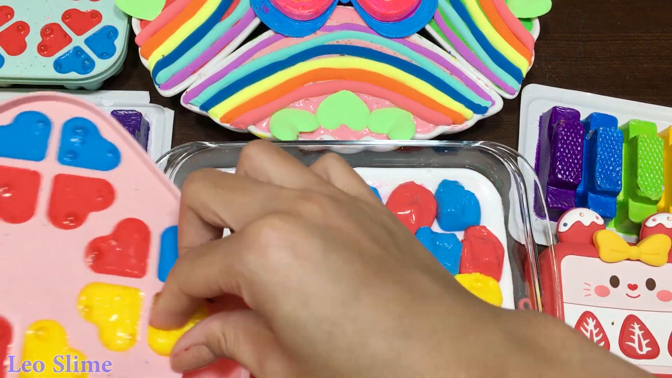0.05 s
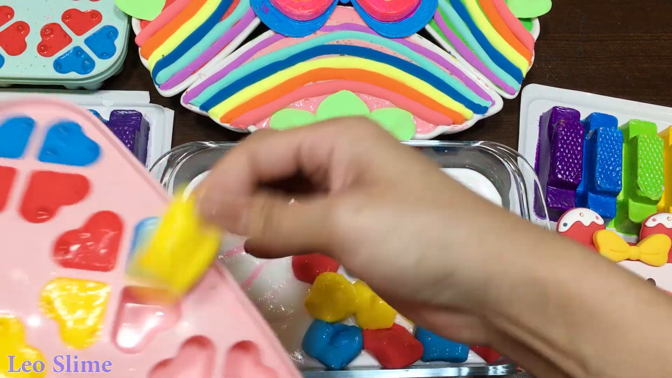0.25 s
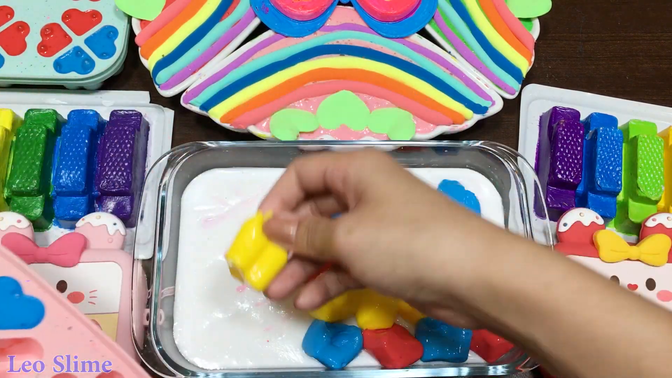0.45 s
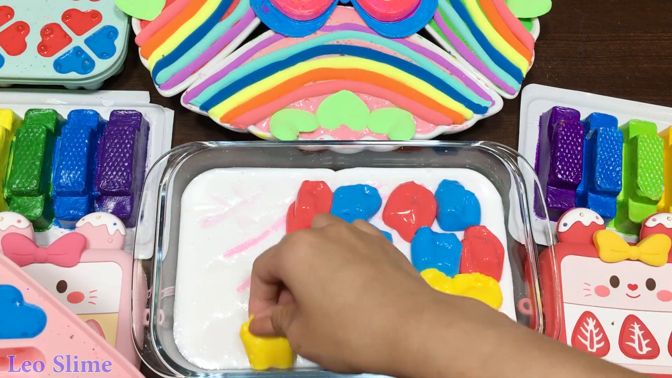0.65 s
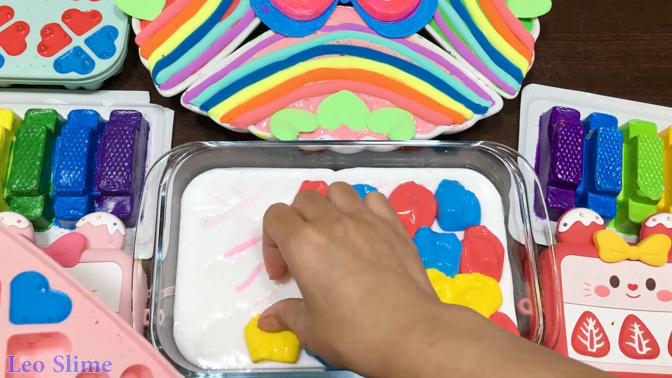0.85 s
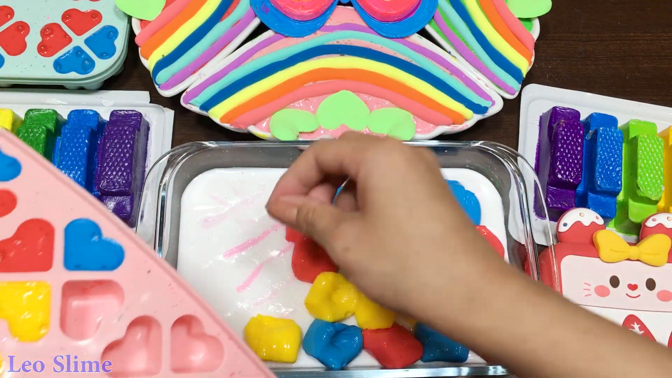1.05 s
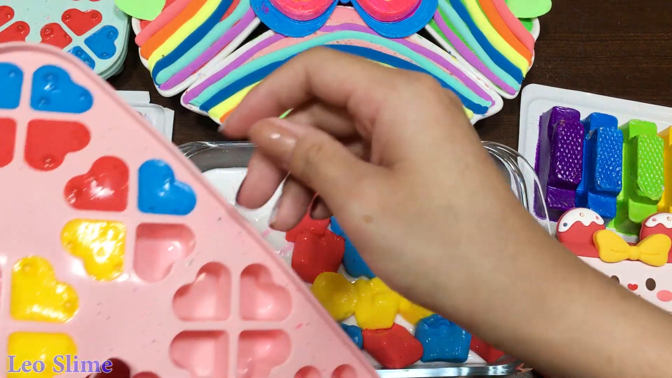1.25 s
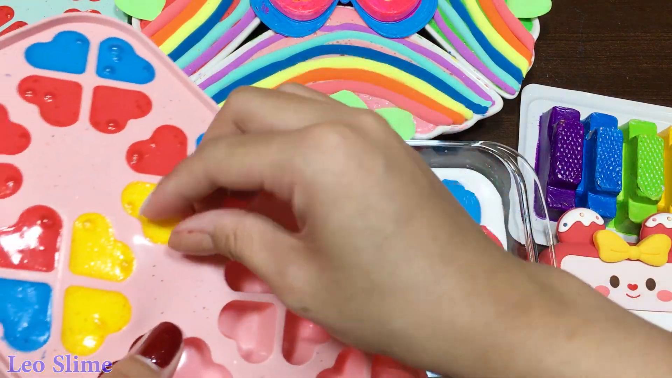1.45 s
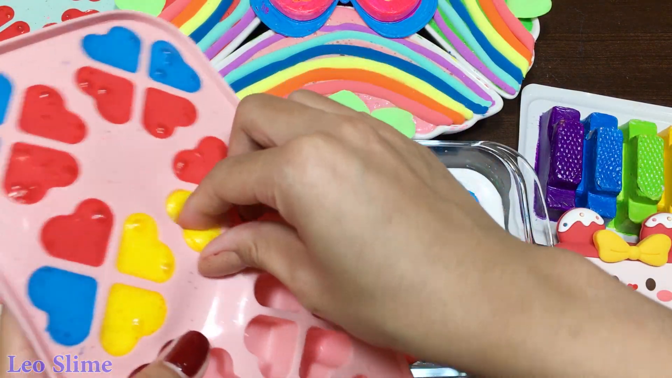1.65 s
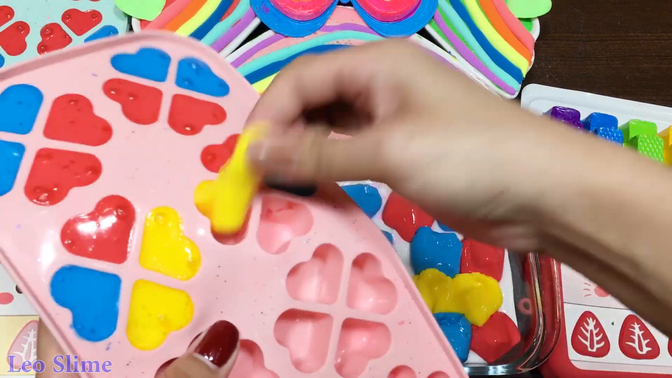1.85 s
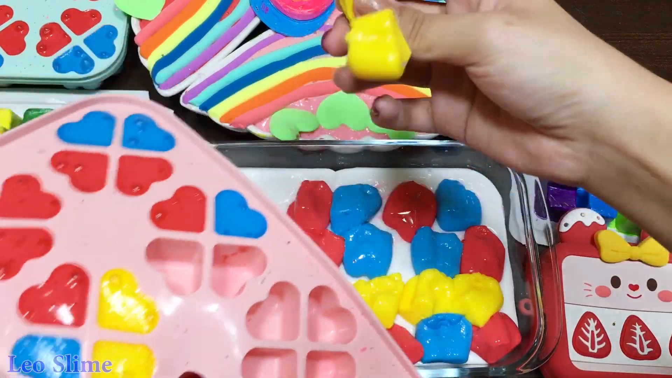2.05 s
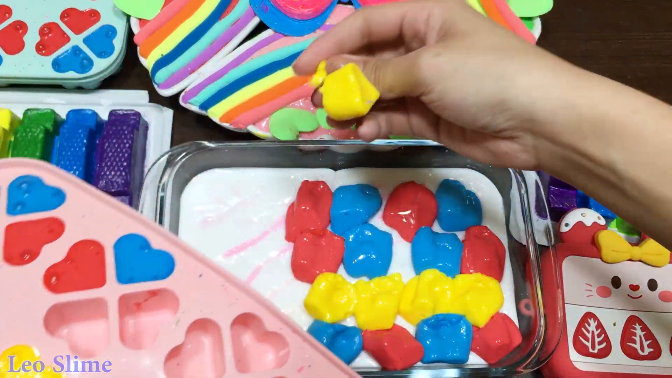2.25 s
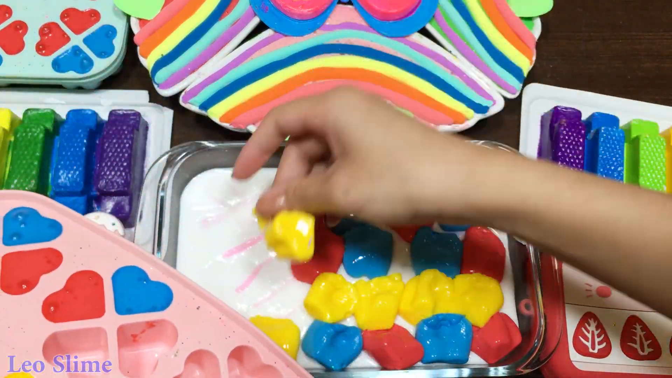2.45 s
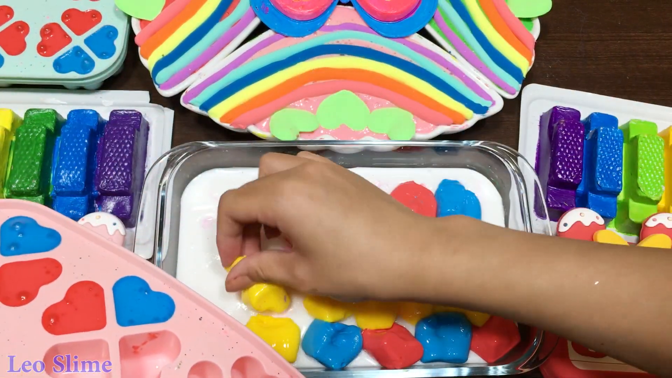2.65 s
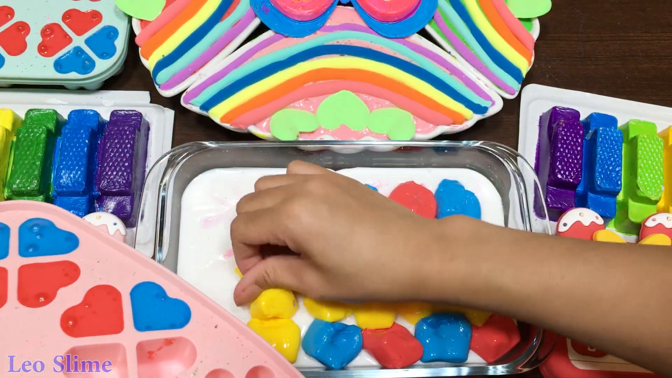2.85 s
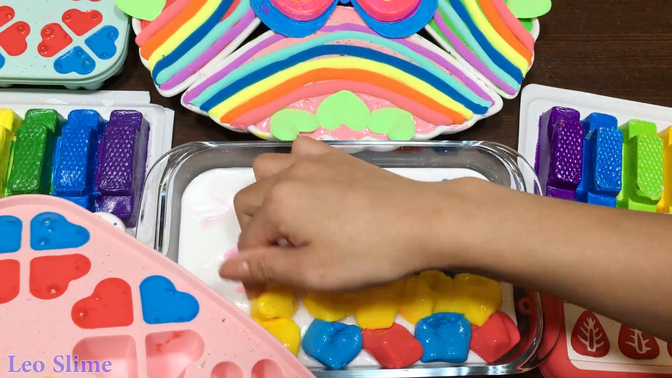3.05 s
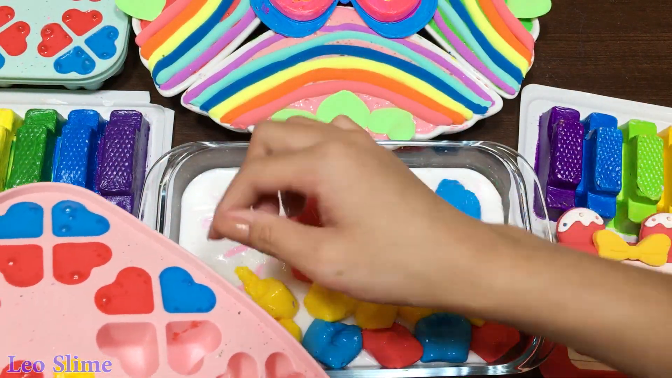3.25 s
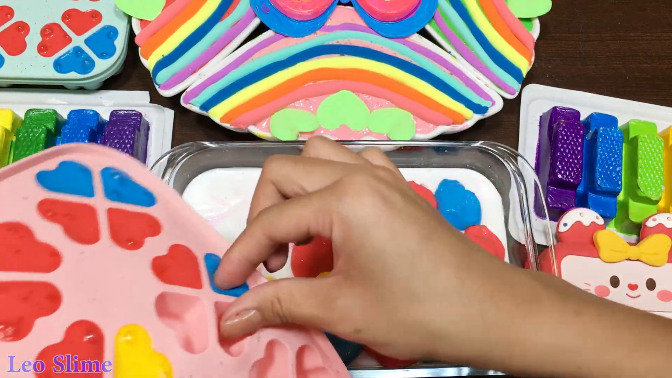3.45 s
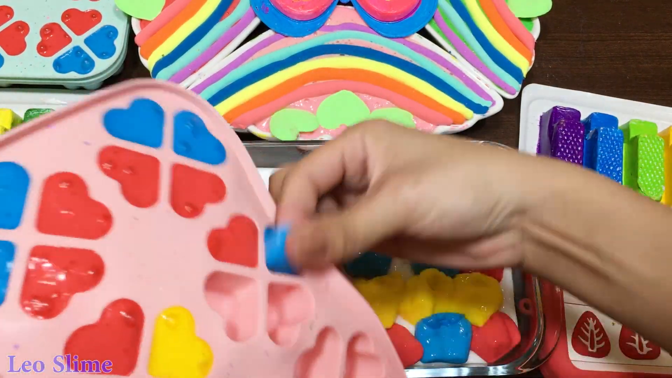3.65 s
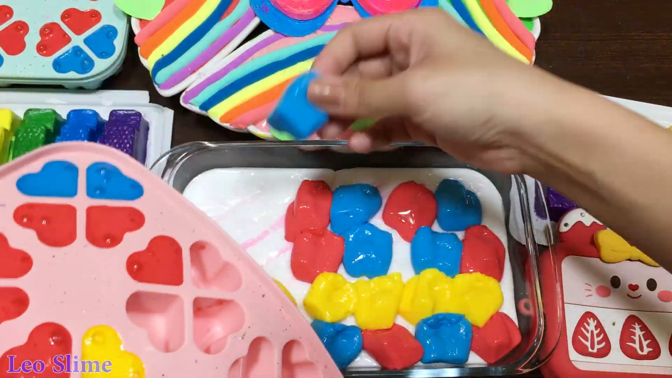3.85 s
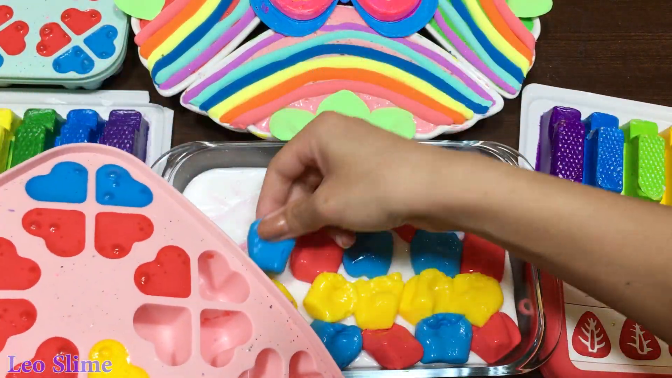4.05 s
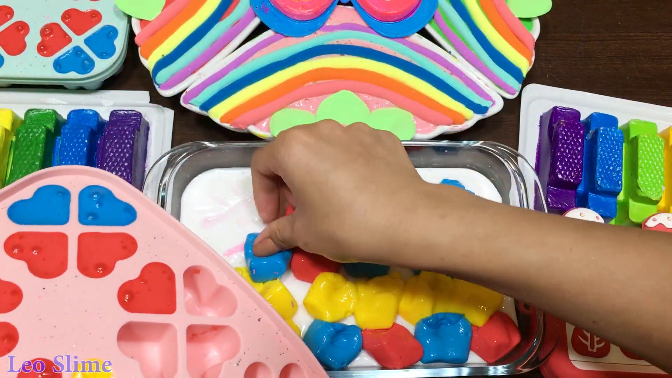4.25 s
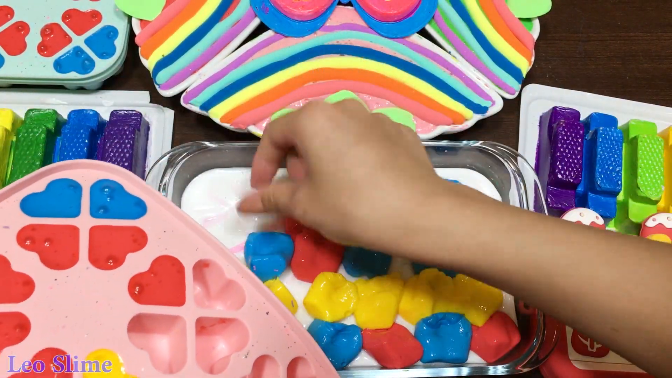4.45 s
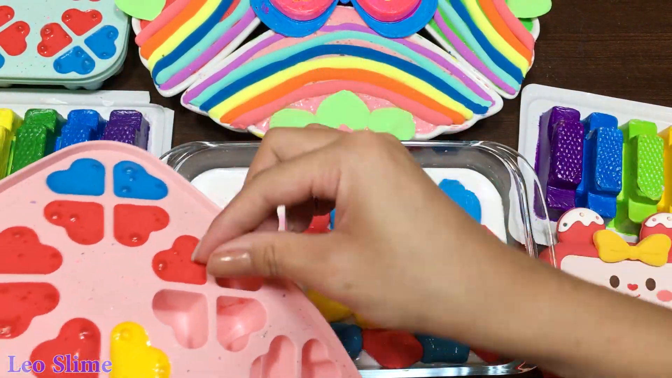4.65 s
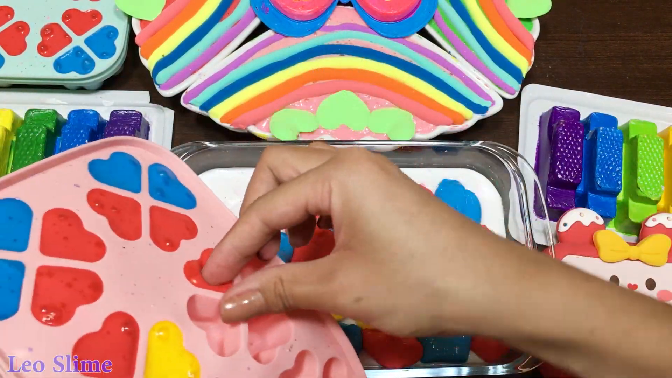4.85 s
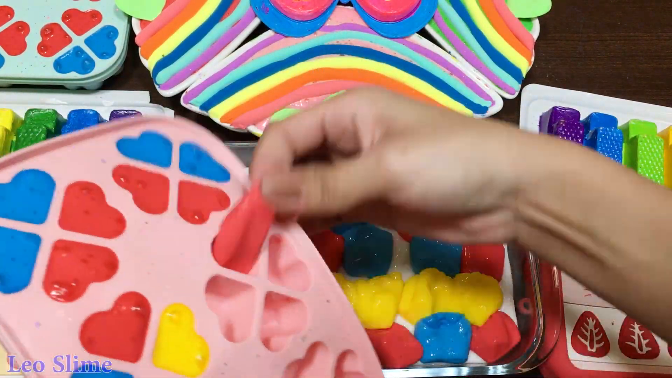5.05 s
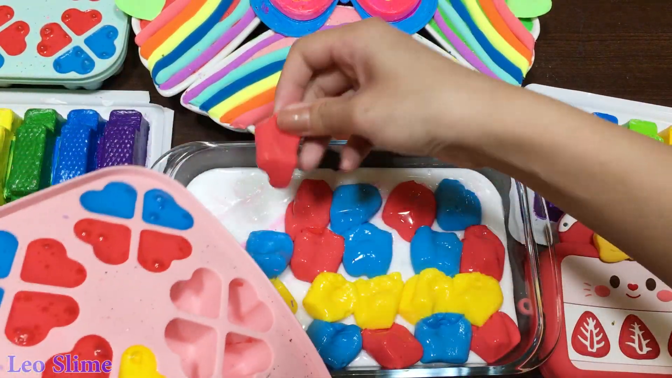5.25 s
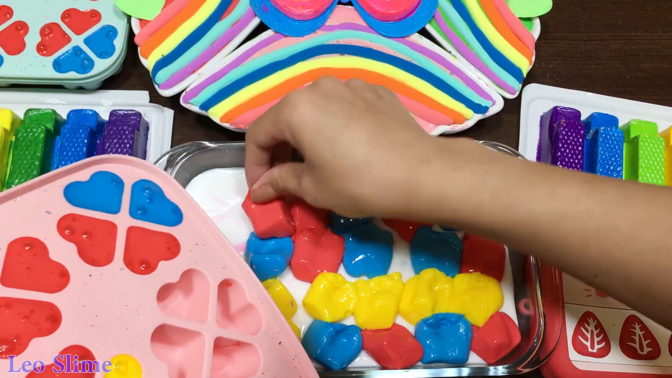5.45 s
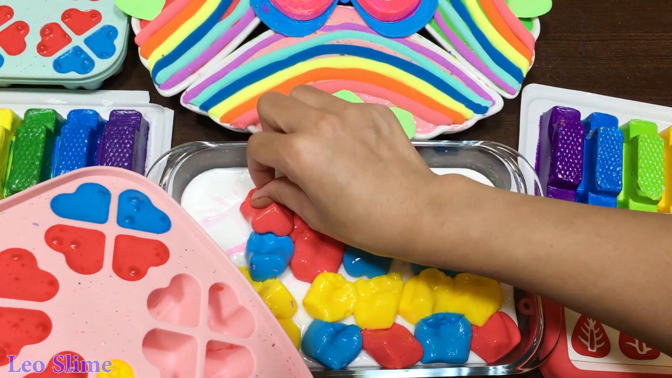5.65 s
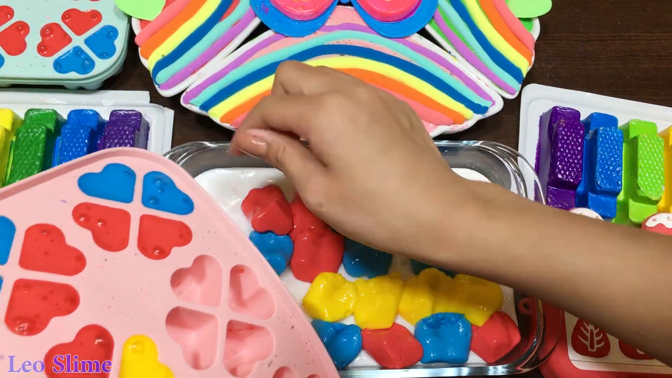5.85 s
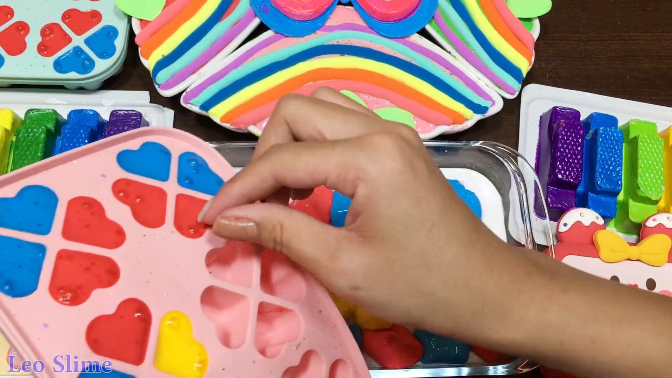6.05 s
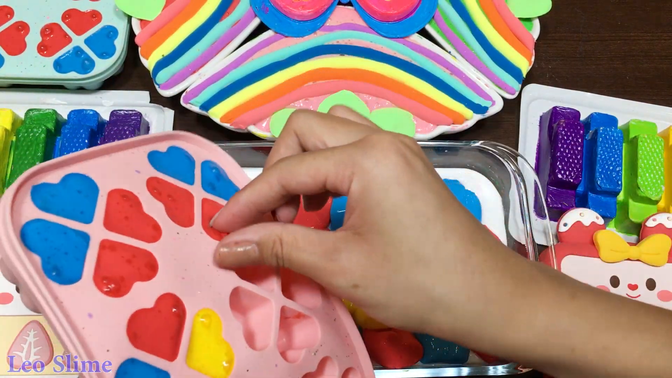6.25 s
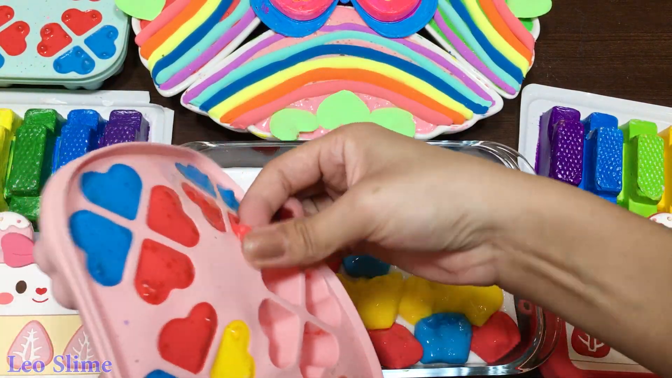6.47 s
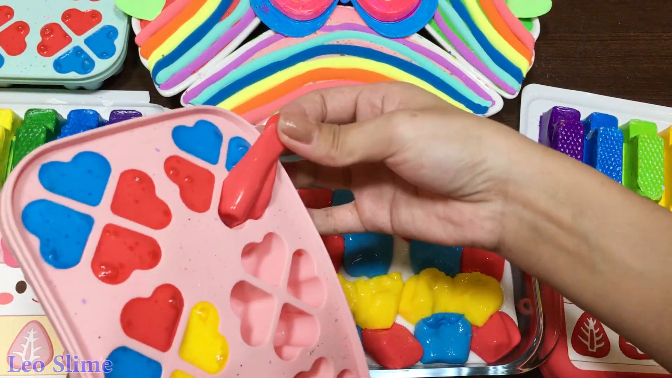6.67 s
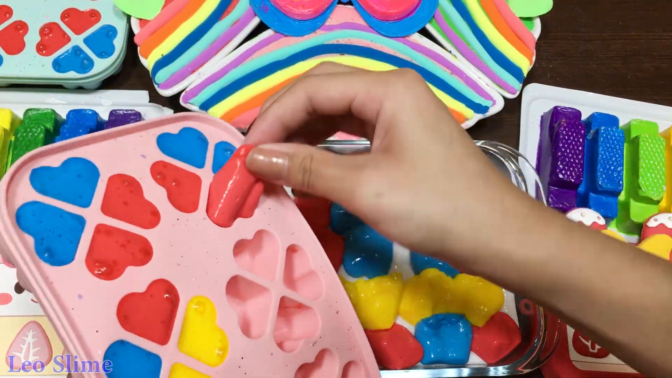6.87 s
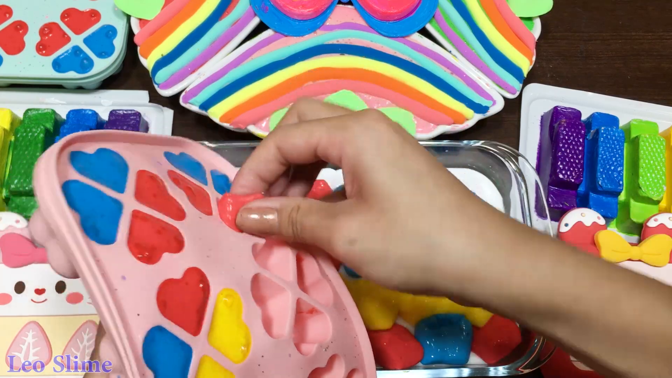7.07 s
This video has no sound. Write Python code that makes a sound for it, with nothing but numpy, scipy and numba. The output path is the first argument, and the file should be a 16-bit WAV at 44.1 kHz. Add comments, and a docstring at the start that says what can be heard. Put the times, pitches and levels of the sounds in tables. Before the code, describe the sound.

Very close to the microphone, five soft clay shapes are pulled from a flexible mould. Each pull builds a fine sticky crackle, then snaps brightly with a short suck of air. Between pulls come faint finger smacks, little wet bubbles and soft presses, and one dull mould knock before the fourth pull. A quiet small room holds a low throbbing appliance hum.

```python
"""Sticky skin tears and air pockets snap as five soft clay hearts leave a flexible mould, close to the ear.
Streams of tiny ringing grains make the tearing and the gurgle; swept noise makes the air rushing into each hollow.
Snaps, bubbles and soft thuds are short damped modes with a spray of echoes; fingers smack and the mould is bumped.
The handling has a faint room tail; two motors beat against each other beneath it, with hum and a rush of air."""
import sys
import numpy as np
from scipy import signal
from scipy.fft import rfft, irfft
from scipy.io import wavfile
from scipy.ndimage import uniform_filter1d
from numba import njit

SR = 44100
rng = np.random.default_rng(int(sys.argv[2]) if len(sys.argv) > 2 else 0)


def file_out(sig):
    """Save sig as 16-bit WAV at sys.argv[1]."""
    # one column per channel
    cols = np.atleast_2d(sig).T
    # limit, then scale
    lim = np.clip(cols, -1, 1)
    pcm = np.round(lim * 32767).astype(np.int16)
    wavfile.write(sys.argv[1], SR, pcm)


N = 313551
TIME = np.arange(N) / SR

# The pieces leaving the mould. Each row: edge gives way in seconds, piece lets go in seconds,
# stretching before the edge in seconds, peeling before the edge in seconds, tearing level in dB,
# sucked air level in dB, slack dip in dB, cavity pitch at release in Hz, cavity level in dB.
PULLS = [(0.345, .395, .33, 0.025, -37.5, -41, 2, 2290, -45.5),
         (1.968, 2.033, .35, 0.057, -36, -40, 4.5, 1694, -44),
         (3.797, 3.85, 0.19, 0.031, -37, -42, 7, 2030, -37),
         (5.169, 5.242, .03, .036, -44, -48, 5.5, 2000, -41),
         (6.649, 6.7, 0.084, 0.015, -43.5, -52, 8.5, 3307, -43.5)]


def undb(db):
    """Decibels to gain."""
    return 10 ** (np.asarray(db) / 20)


def unit(x):
    """Scale to rms 1."""
    return x / np.sqrt(np.mean(x ** 2))


def colour(x, points):
    """Filter by a spectrum of (Hz, dB) points, joined along log frequency."""
    hz, db = np.transpose(points)
    bins = np.maximum(np.fft.rfftfreq(len(x), 1 / SR), 1)
    gain = undb(np.interp(np.log(bins), np.log(hz), db))
    return irfft(rfft(x) * gain, len(x))


def walk(rate):
    """Slow random drift with rms 1; rate is new values per second."""
    k = max(int(SR / rate), 1)
    steps = np.repeat(rng.standard_normal(N // k + 1), k)
    smooth = uniform_filter1d(uniform_filter1d(steps, k), k)
    return unit(smooth[:N])


def add(track, s, sound):
    """Mix a sound in at time s."""
    i = max(int(s * SR), 0)
    track[i:i + len(sound)] += sound[:N - i]


def fade(t, t60):
    """Exponential decay, 60 dB down after t60 seconds."""
    return np.exp(-np.log(1000) * t / t60)


def thin(x, corner_hz):
    """A small source radiates little below its corner."""
    return signal.sosfilt(signal.butter(2, corner_hz, "high", fs=SR, output="sos"), x)


def ring(modes, size=6000):
    """Damped sines from rows (Hz, dB, t60), with peak 1."""
    t = TIME[:size]
    y = sum(undb(db) * np.sin(2 * np.pi * hz * t) * fade(t, t60) for hz, db, t60 in modes)
    return y / np.abs(y).max()


def grains(rate, low_hz, high_hz, cycles, spread_db, size=200):
    """A stream of tiny ruptures, each a damped sine with its own moment, pitch and size."""
    when, pitch, strength, sign = rng.random((int(rate * N / SR), 4)).T[:, :, None]
    hz = low_hz + (high_hz - low_hz) * pitch
    # many weak ruptures, few strong ones, with a ceiling
    strength_db = spread_db * np.minimum(-np.log(1 - strength), np.pi)
    gain = np.sign(sign - .5) * undb(strength_db) * hz
    waves = gain * np.sin(2 * np.pi * hz * TIME[:size]) * fade(TIME[:size], cycles / hz)
    places = (when * N).astype(int) + np.arange(size)
    return np.bincount(places.ravel(), waves.ravel(), N + size)[:N]


def peel(edge_s, free_s, peel_s, slack_db, growth_db):
    """Gain of one pull: it builds, the edge gives way, the clay stretches slack, tightens again and lets go."""
    before, after = np.maximum(edge_s - TIME, 0), np.maximum(TIME - free_s, 0)
    progress = np.clip((TIME - edge_s) / (free_s - edge_s), 0, 1)
    # a 12 dB build over the peel, with a 10 dB jump in the last 11 ms before the edge gives way
    attack = 10 * np.minimum(before / 0.011, 1) + 12 * (before / peel_s) ** 2
    hold = growth_db * progress - slack_db * np.sin(np.pi * progress)
    # a 22 dB cut within 7 ms of letting go, on a tail of 383 dB per second
    release = 22 * np.minimum(after / .007, 1) + 383 * after
    return undb(np.maximum(hold - attack - release, -200))


def parting():
    """How strongly skin tears and air is sucked in, from the pulls and the finger contacts."""
    # Sticky finger contacts. Each row: peak time in seconds, rise in seconds,
    # tearing level in dB, squelch level in dB.
    touches = [(0.033, 0.019, -65.5, -64), (.53, .05, -65, -70), (.79, 0.028, -66.5, -71.5),
               (.869, 0.012, -52, -63.5), (1.053, 0.013, -54.5, -56), (1.41, 0.067, -83, -70),
               (1.632, .01, -64, -52), (2.083, 0.0069, -52, -69.5), (2.22, 0.018, -53.5, -69),
               (2.41, 0.051, -63.5, -71), (2.557, 0.026, -56.5, -71), (2.795, 0.032, -62.5, -80),
               (3.029, 0.031, -55.5, -65.5), (3.057, 0.0086, -47.5, -51), (3.106, 0.027, -60.5, -71),
               (3.322, 0.0092, -59, -59.5), (3.96, 0.0074, -54, -70.5), (4.336, .035, -59.5, -64),
               (4.371, 0.011, -47, -61), (4.576, 0.014, -49, -57.5), (5.31, 0.1, -67, -75.5),
               (5.576, 0.0055, -58.5, -63.5), (5.669, 0.015, -60, -72), (5.906, .016, -60, -56),
               (6.088, 0.0059, -60.5, -59), (6.545, .006, -57.5, -57.5), (6.728, 0.047, -55, -59),
               (7.019, 0.097, -67.5, -71.5)]
    tear, suck = np.zeros(N), np.zeros(N)
    for edge_s, free_s, stretch_s, peel_s, tear_db, suck_db, slack_db, _, _ in PULLS:
        # faint crackle while the mould is bent, with 30 ms edges
        bent = np.clip(np.minimum(TIME - edge_s + stretch_s, edge_s - TIME) / .03, 0, 1)
        # during a pull the stuck skin shrinks and the gap widens
        tear_pull = peel(edge_s, free_s, peel_s, slack_db, growth_db=-2)
        suck_pull = peel(edge_s, free_s, peel_s, slack_db, growth_db=4.5)
        tear += undb(-66) * bent + undb(tear_db) * tear_pull
        suck += undb(-77) * bent + undb(suck_db) * suck_pull
    for s, rise, tear_db, suck_db in touches:
        fall = 0.53 * rise  # a finger comes free faster than it sticks
        t = np.arange(max(-2 * rise, -s), 2 * fall, 1 / SR)
        swell = np.exp(-(t / np.where(t < 0, rise, fall)) ** 2)
        add(tear, s + t[0], undb(tear_db) * swell)
        add(suck, s + t[0], undb(suck_db) * swell)
    return tear, suck


def sticky_clay(tear, suck):
    """Clay parting from mould or skin: fine threads tear, and air gurgles into the opening gap."""
    # Brightness of the tearing threads. Each row: frequency in Hz, level in dB.
    tear_colour = [(1500, -18), (3000, -6.5), (4200, 3), (5000, -4.5), (6200, 3.5), (8000, -0.5),
                   (10000, 1.5), (12500, -1.5), (15500, -3.5)]
    # Tone of the gurgling air. Each row: frequency in Hz, level in dB.
    suck_colour = [(80, -8), (200, 2), (400, -0.5), (650, -3.5), (1000, 0), (1500, 0), (1850, -5),
                   (2300, -1.5), (3100, -18), (5000, -24)]
    # a slow parting breaks single threads; a fast one breaks them in a dense rush
    rush = np.clip(tear / undb(-48.0), 0, 1)
    single = grains(rate=990, low_hz=2492, high_hz=15660, cycles=4, spread_db=6, size=80)
    dense = grains(rate=5300, low_hz=2555, high_hz=15550, cycles=12, spread_db=6.0, size=110)
    gurgle = grains(rate=2000, low_hz=200, high_hz=3300, cycles=10, spread_db=5.5, size=400)
    single, dense = unit(colour(single, tear_colour)), unit(colour(dense, tear_colour))
    gurgle = unit(colour(gurgle, suck_colour))
    threads = np.sqrt(1 - rush) * single + np.sqrt(rush) * dense
    # the clay lets go in uneven little jerks
    jerks = unit(undb(3 * walk(168.7)))
    return jerks * (tear * threads + suck * gurgle)


@njit
def resonator(x, hz, share):
    """Band-pass whose centre moves; its width is a share of the centre."""
    y, b, l = np.empty(len(x)), 0., 0.
    for i in range(len(x)):
        g = np.tan(np.pi * hz[i] / SR)
        v = (b + g * (x[i] - l)) / (1 + g * (g + share))
        b, l, y[i] = 2 * v - b, l + 2 * g * v, share * v
    return y


def cavities(octave_s, swell_s, stop_s, width):
    """The hollow under a lifting piece grows, so the air rushing in slides down in pitch and dies at release."""
    out = np.zeros(N)
    t = np.arange(-3000, 500) / SR  # zero is the release
    for _, free_s, *_, end_hz, db in PULLS:
        hz = np.minimum(end_hz * 2 ** (-t / octave_s), 12000)
        air = resonator(rng.standard_normal(len(t)), hz, float(width))
        air = unit(air / np.sqrt(hz))
        swell = np.exp(-np.abs(t) / np.where(t < 0, swell_s, stop_s))
        fade_in = np.minimum((t - t[0]) / .015, 1)
        add(out, free_s + t[0], undb(db) * swell * fade_in * air)
    return thin(out, corner_hz=898)


def small_snaps(tear, count):
    """Lesser pockets open at uneven moments through each pull, their strength following the tearing there."""
    low_hz, high_hz, t60 = 4540, 14560, 0.0023
    rows = []
    for edge_s, free_s, _, peel_s, *_ in PULLS:
        for k, (late, pitch) in enumerate(rng.random((count, 2))):
            s = np.interp(k + late, [0, count], [edge_s - peel_s, free_s])
            tear_db = 20 * np.log10(tear[int(s * SR)])
            db = tear_db + 14 + 2.5 * rng.standard_normal()
            rows.append((s, db, low_hz + pitch * (high_hz - low_hz), t60))
    return rows


def cracks(table, size=512):
    """The skin of each snapping pocket splits with a bright noise tick, shorter than the pocket's ring."""
    # Brightness of the tick. Each row: frequency in Hz, level in dB.
    crack_colour = [(2000, -18), (8000, -6), (13000, 0.5), (16500, -1.5), (19000, -30)]
    out = np.zeros(N)
    for s, db, _, t60 in table:
        tick = unit(colour(rng.standard_normal(size), crack_colour))
        add(out, s, undb(db - 8) * tick * fade(TIME[:size], .7 * t60))
    return out


def pockets(table, overtone, overtone_db, spray_db, spray_t60, corner):
    """A pocket of air rings with two short modes, then scatters off the fingers and the mould."""
    out = np.zeros(N)
    for s, db, hz, t60 in table:
        # the overtone fades from 6300 Hz up, so the smallest pockets ring with almost one mode only
        upper_db = overtone_db - 29.5 * max(np.log2(hz / 6300), 0)
        pop = ring([(hz, 0, t60), (min(hz * overtone, 15000), upper_db, t60)], size=4000)
        scatter = undb(spray_db) * rng.standard_normal(len(pop)) * fade(TIME[:len(pop)], spray_t60)
        scatter[0] = 1  # the direct sound
        pop = thin(signal.fftconvolve(pop, scatter), corner * hz)
        add(out, s, undb(db) * pop / np.abs(pop).max())
    return out


def squeeze(s, db, hz, spread_oct, t60, count):
    """One push bursts a run of pockets around one pitch, weaker as the clay settles."""
    push_s, sag_db = 0.12, -13
    rows = []
    for p in (np.arange(count) + .5 * rng.random(count)) / count:
        pitch = hz * 2 ** (spread_oct * rng.standard_normal())
        rows.append((s + push_s * p, db + sag_db * p, pitch, t60))
    return rows


def bumps():
    """A dull knock on the mould, ringing in its damped modes."""
    # Knocks. Each row: start in seconds, peak level in dB ahead of the low cut.
    knocks = [(4.7426, -16)]
    # Modes of the mould. Each row: frequency in Hz, relative level in dB, ring t60 in seconds.
    mould = [(304, -13, 0.13), (429, 0, 0.024), (515, -8.5, 0.013), (750, -4, 0.023), (1155, -7, 0.013),
             (2450, 3, 0.012), (2860, 1.5, 0.0071), (3660, -14.5, 0.022), (6550, 10, 0.0011)]
    out = np.zeros(N)
    for s, db in knocks:
        add(out, s, undb(db) * ring(mould))
    return thin(out, corner_hz=285)


def room(x, t60, wet_db, size=22000):
    """A small furnished room: a faint decaying noise tail, strongest in the middle range."""
    t = TIME[:size]
    tail_colour = [(100, -15.5), (300, 1), (700, 5.0), (1600, 0.0), (3500, -1), (7000, -9), (15000, -11.5)]
    tail = colour(rng.standard_normal(size), tail_colour)
    tail = tail * fade(t, t60) * np.minimum(t / 0.0041, 1)
    tail = tail / np.sqrt(np.sum(tail ** 2))
    return x + undb(wet_db) * signal.fftconvolve(x, tail)[:N]


def appliances():
    """Two motors at slightly different speeds throb; higher hum lines waver over a soft rush of air."""
    # The two motors. Each row: frequency in Hz, rms level in dB before the slow drift.
    motors = [(51.06, -54.5), (55.58, -56.5)]
    # Hum and whine. Each row: frequency in Hz, rms level in dB before the wavering.
    hum_lines = [(105.4, -59), (166.8, -70), (210.8, -68.5), (333.5, -64.5), (422, -76), (14433, -75.5)]
    # Tone of the air. Each row: frequency in Hz, relative level in dB.
    air_colour = [(25, -32.5), (45, 0), (70, 0), (110, -3.5), (160, 0), (230, -4.5), (380, -9.5),
                  (550, -17.5), (1000, -22), (2000, -27), (4000, -28.5), (6500, -28.5), (11000, -32),
                  (16000, -33.5)]
    null_s = .034  # a moment when the two motors oppose each other
    slow, fast = (undb(db) * np.cos(2 * np.pi * hz * (TIME - null_s)) for hz, db in motors)
    throb = (slow - fast) * undb(1.4 * walk(0.86))
    hum = np.zeros(N)
    for hz, db in hum_lines:
        level = undb(db + 0.97 * walk(3.3))
        hum += level * np.sin(2 * np.pi * hz * TIME + 0.18 * walk(3.7))
    air = unit(colour(rng.standard_normal(N), air_colour))
    return np.sqrt(2) * (throb + hum) + undb(-60.5) * air  # root 2 turns rms into sine peak


def scene():
    """Handling sounds in the room, over the hum."""
    # The loudest snaps: air pockets opening, and threads breaking with a short dry click. # Each row: start in
    # seconds, peak level in dB, pitch in Hz, ring t60 in seconds.
    loud_snaps = [(.2465, -34, 5930, .001), (.2709, -32.5, 6350, 0.00064), (.3038, -24, 6900, 0.00062),
                  (.32, -14.5, 4500, 0.0034), (.3354, -32, 4540, .003), (.3455, -4, 9870, 0.0052),
                  (.3517, -3.5, 6350, 0.0056), (.3637, -12, 6437, 0.0012), (.3665, -12.5, 9300, .003),
                  (.406, -26, 4470, 0.001), (1.8527, -3.5, 10700, 0.00055), (1.8529, -24.5, 4000, 0.0023),
                  (1.9213, -28, 11000, 0.0035), (1.9361, -37, 6060, 0.0039), (1.9621, -22, 6900, 0.0016),
                  (1.9811, -19.5, 3570, 0.0068), (1.9874, -16, 4440, 0.001), (2.9982, -31.5, 13100, .0014),
                  (3.7907, -23, 4830, .004), (3.7979, -12.5, 6540, 0.0055), (3.804, -17.5, 7900, 0.0019),
                  (3.8382, -12.5, 8850, 0.0039), (5.0095, -41, 13040, .0006), (5.0385, -36.5, 13000, .0008),
                  (5.1245, -33, 13100, 0.001), (5.1526, -32.5, 3300, 0.0035), (5.1722, -23.5, 5930, 0.0056),
                  (5.1917, -28, 10800, 0.0015), (5.2179, -15.5, 9400, .0019), (6.6506, -21, 10500, 0.00061),
                  (6.6738, -23, 10400, 0.00043), (6.696, -23.5, 13530, 0.003), (6.6955, -30.5, 3600, .005),
                  (7.0902, -35, 13000, .0014)]
    # Single bubbles bursting under the fingers.
    # Each row: start in seconds, peak level in dB, pitch in Hz, ring t60 in seconds.
    single_bubbles = [(.012, -43.5, 1500, 0.0015), (.069, -49, 1560, 0.0044), (.32, -30.5, 1290, 0.0044),
                      (0.391, -29, 2350, .009), (1.054, -45.5, 1320, .012), (1.611, -41.5, 1300, .011),
                      (1.853, -35.5, 1160, .003), (2.559, -45.5, 2490, 0.013), (3.7052, -46, 1610, 0.0041),
                      (4.237, -50.5, 1477, 0.0083), (4.5768, -32, 1575, 0.015),
                      (4.727, -41.5, 1610, 0.0043), (5.231, -29.5, 1970, .008),
                      (6.067, -40.5, 2600, 0.0011), (6.091, -41.5, 920, 0.005), (6.7121, -33, 2380, 0.0034),
                      (6.7965, -37, 1470, .005)]
    # Fingers push the clay down with a soft thud.
    # Each row: start in seconds, peak level in dB before it sags, thud pitch in Hz.
    presses = [(1.06, -45, 285), (3.075, -49, 264), (4.594, -51, 279)]
    tear, suck = parting()
    bubbles, pushes = list(single_bubbles), []
    for s, db, hz in presses:
        pushes += squeeze(s, db, hz, spread_oct=0.11, t60=0.081, count=3)
        # bubbles squeezed out, a little below the thud in level
        bubbles += squeeze(s, db - 2, hz=1023, spread_oct=0.19, t60=.017, count=8)
    openings = list(loud_snaps) + small_snaps(tear, count=8)
    snaps = cracks(openings) + pockets(
        openings, overtone=1.68, overtone_db=0.5, spray_db=-21.5, spray_t60=0.0097, corner=0.27)
    plops = pockets(bubbles, overtone=1.338, overtone_db=-5, spray_db=-19, spray_t60=0.018, corner=0.48)
    thuds = pockets(pushes, overtone=1.79, overtone_db=-12.5, spray_db=-32, spray_t60=0.029, corner=0.54)
    slides = cavities(octave_s=0.041, swell_s=0.027, stop_s=0.0031, width=0.19)
    handling = sticky_clay(tear, suck) + slides + snaps + plops + thuds + bumps()
    return (room(handling, t60=0.18, wet_db=-20.5) + appliances())[None]


def record(dry):
    """A steep low-pass cuts the top above 16.3 kHz."""
    return signal.sosfilt(signal.ellip(8, .2, 70, 16300, fs=SR, output="sos"), dry)


dry = scene()
out = record(dry)
file_out(out)
```